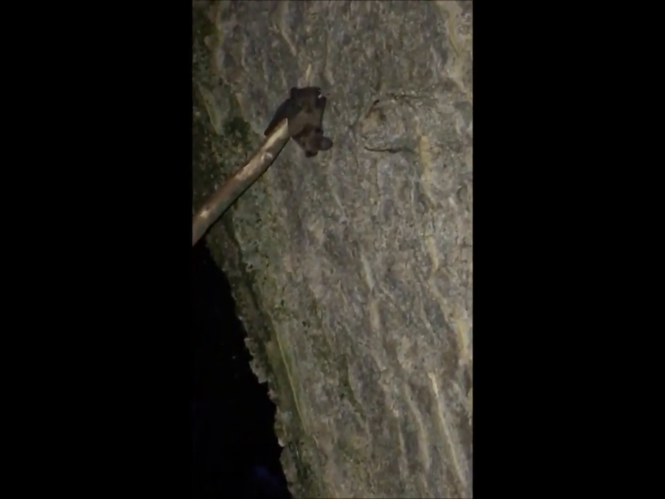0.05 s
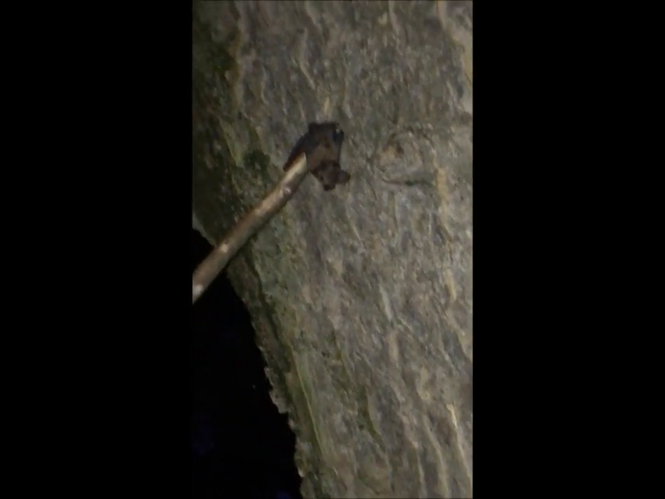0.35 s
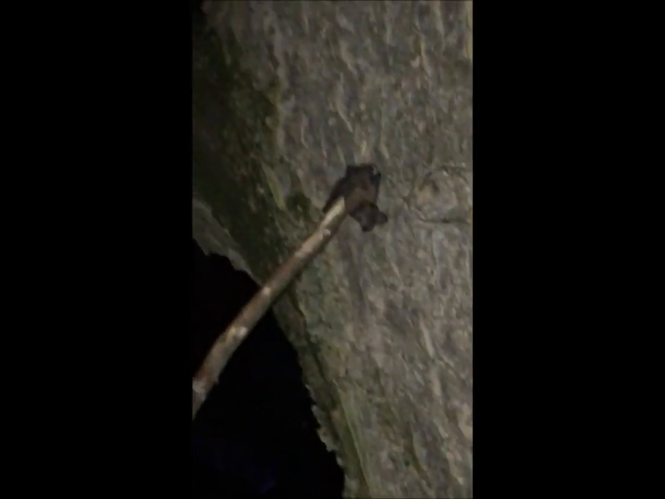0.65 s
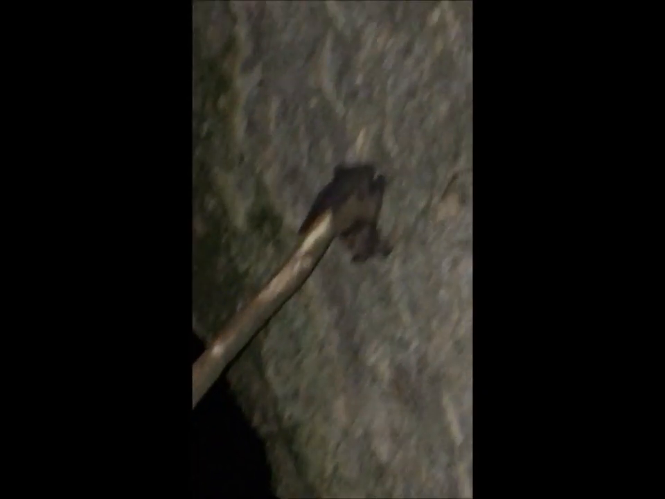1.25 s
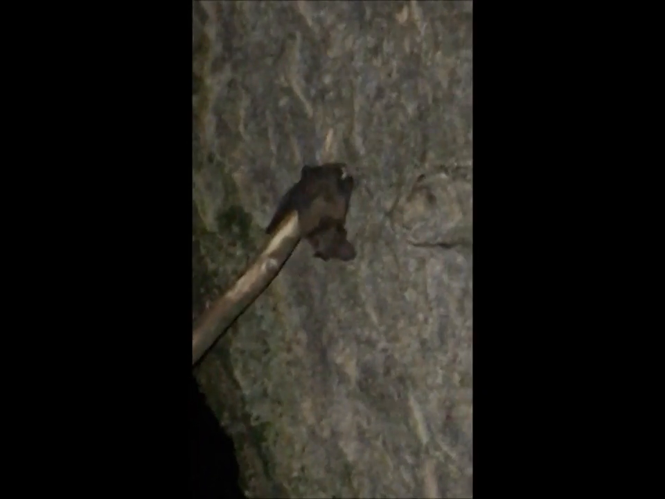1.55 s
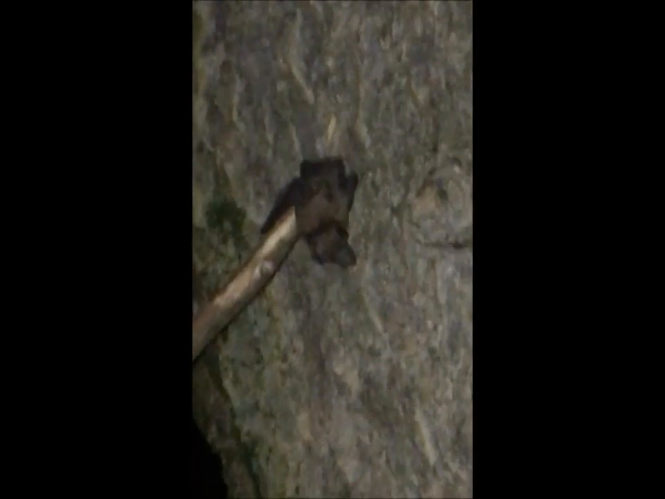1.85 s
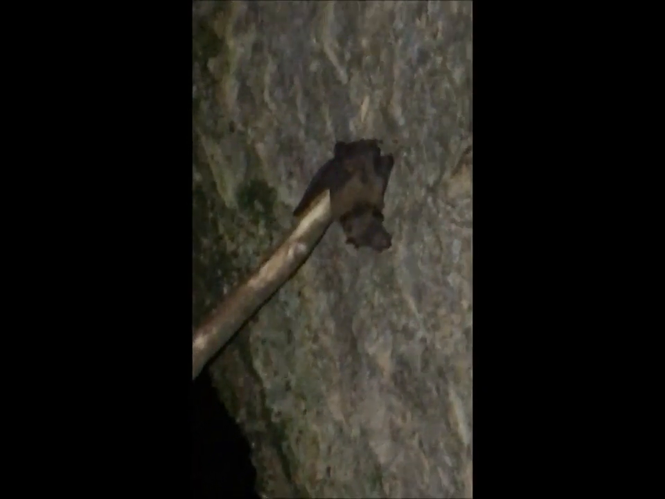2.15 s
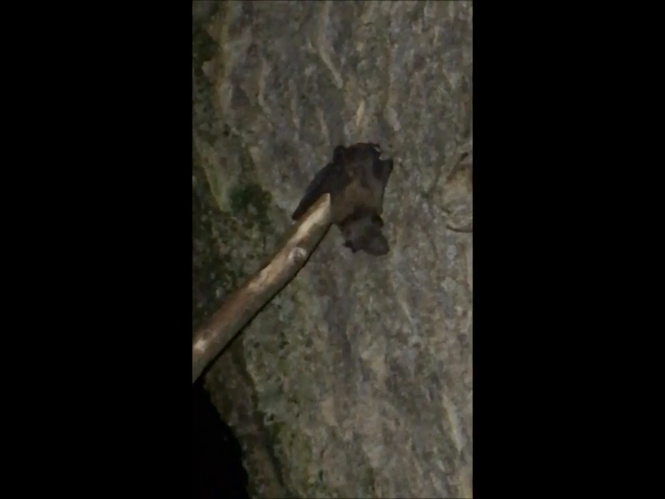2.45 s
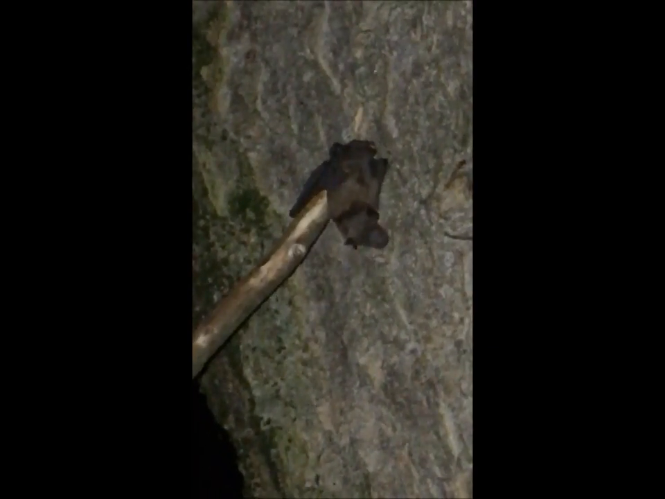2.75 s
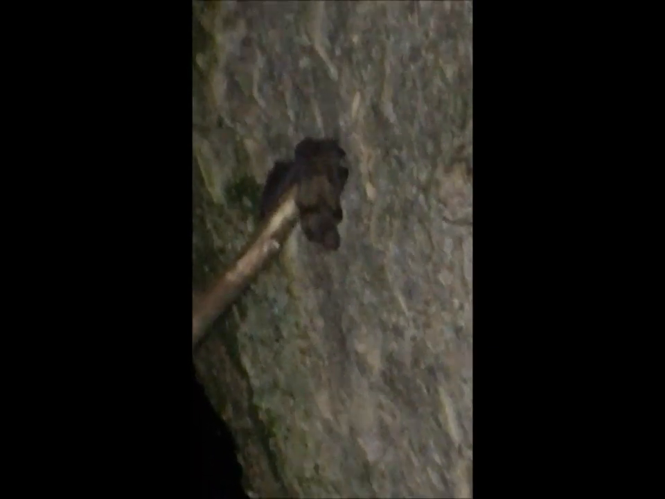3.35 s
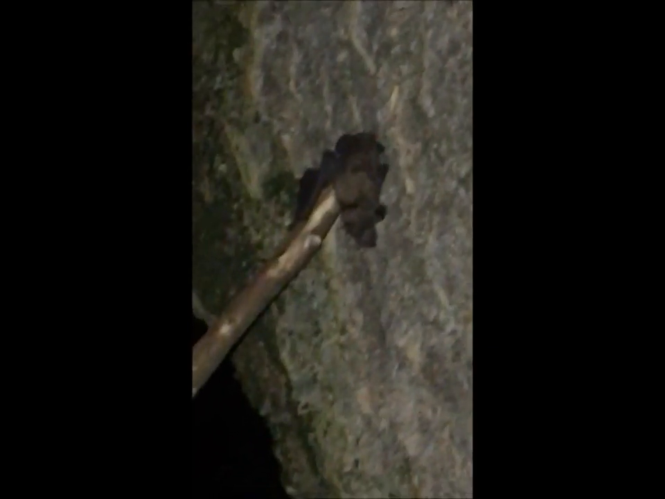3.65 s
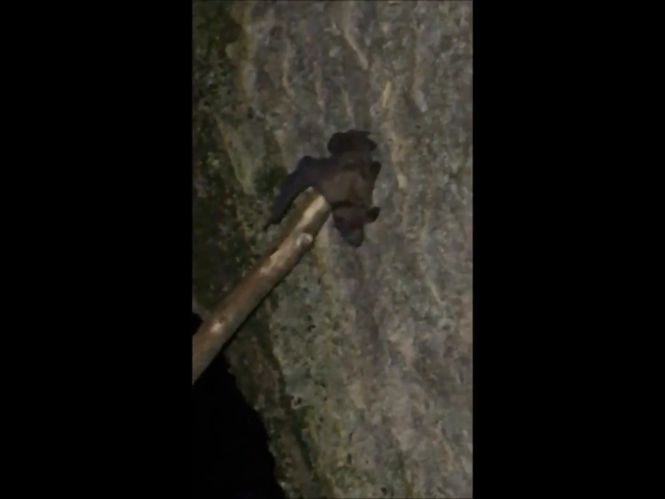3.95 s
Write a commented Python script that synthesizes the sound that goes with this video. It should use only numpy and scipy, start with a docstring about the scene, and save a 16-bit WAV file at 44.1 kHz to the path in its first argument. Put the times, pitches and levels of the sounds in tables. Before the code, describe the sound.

A small bat gives sharp, very high chirps and clicks over quiet hiss.

```python
"""A small bat scolding

A bat on a tree trunk, touched with a stick, scolds close to the microphone. Each call is a whistle of
a few milliseconds that plunges from near 16 kHz towards 8 kHz and leaves a faint echo. A few come with
a raspy squeak, and strong ones overload the microphone with a soft thump. Claws or the stick brush
the bark, and behind it all lie quiet hiss and a low rumble."""
import sys
import numpy as np
from scipy import signal
from scipy.fft import rfft, irfft, next_fast_len
from scipy.io import wavfile
from scipy.ndimage import map_coordinates

SR = 44100
rng = np.random.default_rng(int(sys.argv[2]) if len(sys.argv) > 2 else 0)


def int16_out(signal):
    """Quantize to a 16-bit WAV file."""
    q = np.round(np.clip(np.atleast_2d(signal).T, -1, 1) * 32767)
    wavfile.write(sys.argv[1], SR, q.astype(np.int16))


N = 176400  # 4 seconds


def amp(db):
    """Turn decibels (dB) into a number to multiply a sound by."""
    return 10 ** (np.asarray(db) / 20)


def unit(x):
    """Scale a sound so that its average power is 1."""
    return x / np.sqrt(np.mean(x ** 2) + 1e-20)


def filtered(x, response):
    """Turn each frequency of x up or down by the factor response(hz)."""
    size = next_fast_len(N + SR // 2)
    return irfft(rfft(x, size) * response(np.fft.rfftfreq(size, 1 / SR)), size)[:N]


def add(track, start_s, sound):
    """Mix a sound into the track, dropping whatever falls outside it."""
    i = round(start_s * SR)
    part = sound[max(-i, 0):N - i]
    track[max(i, 0):][:len(part)] += part


def wobble(t, rate):
    """A smooth random curve that passes through `rate` random values a second."""
    return map_coordinates(rng.standard_normal(512), [(t - t[0]) * rate], mode='wrap')


def noise_band(centre_hz, octaves):
    """Noise gathered around one pitch; more octaves make it broader."""
    noise = rng.standard_normal(N)
    return unit(filtered(noise, lambda hz: np.exp(-(np.log2((hz + 1) / centre_hz) / octaves) ** 2)))


def background():
    """Hiss whose treble dips briefly three times, and a low rumble that swells and sinks."""
    # Each row: frequency in Hz, relative level of the hiss in dB.
    hiss_tone = [(20, -30), (32, -17), (43, -9), (54, -3), (72, -4), (88, -6), (108, -15), (160, -12),
                 (250, -19), (310, -16.5), (430, -22.5), (600, -23), (800, -26.3), (1200, -26),
                 (1600, -26.7), (2100, -26), (2600, -28.3), (3050, -27.3), (3500, -28.6), (3900, -26.3),
                 (4400, -29.5), (4950, -32), (5600, -30.5), (9500, -35), (10400, -39), (11200, -36.3),
                 (14000, -38.7), (15500, -40), (16200, -50)]
    # Each row: time in seconds, change in the treble's level in dB.
    treble_dips = [(0, 0), (1.49, 0), (1.51, -7), (1.61, -7), (1.66, 0), (2.055, 0), (2.07, -7), (2.09, -7),
                   (2.11, 0), (2.72, 0), (2.75, -7), (2.91, -7), (2.97, 0), (4, 0)]
    # Each row: time in seconds, relative level of the rumble in dB before swell_share scales it.
    rumble_levels = [(0.0, 2.6), (0.39, -0.9), (0.53, 3.6), (1.0, -0.6), (1.07, -6.4), (1.13, 0.2),
                     (1.3, 1.3), (1.36, -1.9), (1.5, -2.2), (1.65, 3.4), (1.81, -7.0), (1.91, 3.6),
                     (2.0, -0.9), (2.09, 3.5), (2.33, 0.2), (2.44, -5.9), (2.7, 3.0), (2.93, -0.7),
                     (2.98, 1.9), (3.05, -3.4), (3.1, -1.4), (3.35, -1.9), (3.45, 2.9), (3.51, -1.8),
                     (3.66, 2.7), (3.99, -5.3)]
    hiss_db, treble_hz, dip_share = -56.3, 3600, .15  # this share of a dip reaches the whole hiss
    rumble_db, rumble_hz, width_hz = -60, 75, 8
    swell_share, bass_hz = .8, 140  # the bass of the hiss swells along with the rumble
    t = np.arange(N) / SR
    tone_hz, tone_db = np.transpose(hiss_tone)
    tone = lambda hz: amp(np.interp(np.log(hz + 1), np.log(tone_hz + 1), tone_db))
    hiss = amp(hiss_db) * unit(filtered(rng.standard_normal(N), tone))
    treble = filtered(hiss, lambda hz: dip_share + (1 - dip_share) * hz**2 / (hz**2 + treble_hz**2))
    bass = filtered(hiss, lambda hz: np.exp(-(hz / bass_hz) ** 2))
    dips = amp(np.interp(t, *np.transpose(treble_dips)))
    narrow_peak = lambda hz: 1 / (1 + ((hz - rumble_hz) / width_hz) ** 2)
    rumble = unit(filtered(rng.standard_normal(N), narrow_peak))
    swell = unit(amp(swell_share * np.interp(t, *np.transpose(rumble_levels))))
    return hiss + (dips - 1) * treble + (swell - 1) * bass + amp(rumble_db) * swell * rumble


def whistle(hz):
    """A pure tone that follows a pitch curve and fades out where it gets too high to hear."""
    audible = np.clip((17500 - hz) / 1000, 0, 1)
    return audible * np.sin(2 * np.pi * (np.cumsum(hz) / SR + rng.random()))


def coloured(x, bands):
    """Boost or weaken bands of pitch, a little differently for each call as the bat's head turns."""
    for (hz, width, db), (shift, depth) in zip(bands, rng.standard_normal((len(bands), 2))):
        centre = min(hz * (1 + .01 * shift), SR / 2 - 1)
        band = signal.lfilter(*signal.iirpeak(centre, centre / width, SR), x)
        x = x + (amp(db * (1 + .25 * depth)) - 1) * band
    return x


def reflections(fade_s, delay_s):
    """A cloud of tiny echoes that has built up by delay_s and drops 60 dB in fade_s."""
    t = np.arange(SR // 3) / SR
    onset = np.clip(2 * t / delay_s - 1, 0, 1)
    tail = rng.standard_normal(len(t)) * amp(-60 * t / fade_s) * onset
    return tail / np.linalg.norm(tail)


def with_echo(call):
    """A call arrives directly, bounces off the bark and echoes from the surroundings."""
    # Each row of both tables: centre of a band in Hz, its width in Hz, typical boost or cut in dB.
    direct_bands = [(8450, 900, 5.5), (8950, 200, -7), (10900, 500, -14), (12400, 400, -6),
                    (13750, 600, 2.5), (14750, 450, -6)]
    echo_bands = [(13400, 2000, -5.5), (15400, 700, 2)]
    bark = amp(-19) * reflections(fade_s=.016, delay_s=.001)
    bark[0] += 1  # the direct sound
    surroundings = amp(-24.5) * reflections(fade_s=.2, delay_s=.007)
    near = signal.fftconvolve(coloured(call, direct_bands), bark)
    far = signal.fftconvolve(coloured(call, echo_bands), surroundings)
    return near + far


def scolding_calls():
    """The bat's plunging whistles open with a click and grow rough as they fade."""
    # Each row: time of the peak in seconds, level in dB, pitch at the peak in Hz, pitch it heads for
    # in Hz, then four times in seconds: to glide about two thirds of the way there, to rise 60 dB,
    # to fall 60 dB, and from the peak to the end.
    calls = [(0.0149, -18.4, 13590.0, 7140.0, 0.0012, 0.0025, 0.0045, 0.006),
             (0.0494, -11.4, 14360.0, 6600.0, 0.0058, 0.002, 0.013, 0.0112),
             (0.5109, -12.6, 14400.0, 6350.0, 0.0052, 0.0016, 0.0127, 0.012),
             (0.5572, -16.4, 14030.0, 5810.0, 0.007, 0.009, 0.0123, 0.0083),
             (0.7815, -24.5, 12910.0, 8190.0, 0.0016, 0.0006, 0.0061, 0.0033),
             (0.8855, -20.2, 14580.0, 7760.0, 0.0049, 0.008, 0.0183, 0.0021),
             (1.0904, -12.8, 14100.0, 6030.0, 0.0046, 0.0014, 0.0088, 0.0055),
             (1.6515, -12.1, 13700.0, 6320.0, 0.0072, 0.007, 0.012, 0.0074),
             (2.1054, -7.5, 13640.0, 6350.0, 0.0057, 0.0053, 0.0104, 0.0075),
             (2.3282, -13.0, 13290.0, 7510.0, 0.0037, 0.001, 0.01, 0.0061),
             (2.9365, -22.5, 13160.0, 8880.0, 0.0008, 0.0021, 0.0083, 0.0071),
             (2.968, -12.9, 14140.0, 6490.0, 0.005, 0.0013, 0.0124, 0.0111),
             (3.1999, -12.1, 14060.0, 8190.0, 0.0045, 0.0011, 0.0117, 0.0043),
             (3.3386, -28.6, 13130.0, 10980.0, 0.0008, 0.001, 0.0132, 0.0011),
             (3.3651, -23.9, 13570.0, 7950.0, 0.0014, 0.0016, 0.0077, 0.009),
             (3.3971, -18.4, 14180.0, 7650.0, 0.0036, 0.0011, 0.0128, 0.0101),
             (3.662, -12.8, 14360.0, 6190.0, 0.0076, 0.0085, 0.0145, 0.0091),
             (3.8694, -20.3, 12170.0, 7330.0, 0.0026, 0.0006, 0.0091, 0.005),
             (3.913, -15.8, 12260.0, 8270.0, 0.0031, 0.004, 0.01, 0.0076)]
    lowest_hz, highest_hz, jitter = 8050, 15650, .012  # the glide's limits, and how much it trembles
    tail_db, release_s = -36, .001  # a long call levels out this far below its peak, then stops
    roughness, roughen_s = .3, .01
    click_db, click_fade_s, click_lead_s = -46.5, .02, .0015
    out = np.zeros(N)
    t = np.arange(-SR // 200, SR // 50) / SR  # zero is the call's peak
    for peak_s, db, peak_hz, end_hz, glide, rise, fall, length in calls:
        plunge = end_hz + (peak_hz - end_hz) * np.exp(-t / glide)
        hz = np.clip(plunge, lowest_hz, highest_hz) * (1 + jitter * wobble(t, 2500))
        shape_db = np.minimum(60 * t / rise, np.maximum(-60 * t / fall, tail_db))
        loudness = amp(db + shape_db) * np.clip((length - t) / release_s, 0, 1)
        flutter = 1 + roughness * np.clip(t / roughen_s, 0, 1) * wobble(t, 1500)
        click_age = t + click_lead_s
        click_level = (click_age > 0) * amp(db + click_db - 60 * abs(click_age) / click_fade_s)
        click = click_level * rng.standard_normal(len(t))
        voice = whistle(hz) + amp(-6) * whistle(2 * hz)
        add(out, peak_s + t[0], with_echo(click + loudness * flutter * voice))
    return out


def squeaks():
    """Some calls break into a short, raspy squeak near 3 kHz whose pitch rises and falls."""
    # Each row: start in seconds, pitch in Hz, level in dB, length in seconds.
    events = [(.0147, 3250, -43, .008), (2.9372, 2980, -48.5, .0042), (3.367, 2680, -57, .005)]
    # Levels in dB of the tones at one to five times the pitch.
    harmonics_db = [0, -14, 0, -1, 2]
    bend, jitter = .14, .06  # as shares of the pitch
    rasp_db, rasp_fade_s = -4, .04
    out = np.zeros(N)
    t = np.arange(SR // 30) / SR
    for start_s, hz, db, length in events:
        arch = np.sin(np.pi * np.clip(t / length, 0, 1))
        pitch = hz * (1 + bend * (arch - np.sqrt(.5))) * (1 + jitter * wobble(t, 2500))
        voice = sum(amp(level) * whistle(k * pitch) for k, level in enumerate(harmonics_db, 1))
        rasp = amp(rasp_db - 60 * t / rasp_fade_s) * noise_band(hz, octaves=.42)[:len(t)]
        add(out, start_s, with_echo(amp(db) * (np.sqrt(abs(arch)) * voice + rasp)))
    return out


def microphone_thumps():
    """An overloaded microphone turns a call into one push, rings, then swings back to rest."""
    # Each row: time in seconds, push level in dB before the bass cut, width in seconds, swing in dB.
    thumps = [(.0155, -48, .0007, -60), (.0506, -29.5, .00052, -45), (.5123, -33, .00054, -45),
              (.558, -46, .0005, -60), (1.0912, -41, .0006, -57), (1.6510, -37, .00065, -43.5),
              (2.1066, -39, .0009, -47), (2.9375, -45, .0005, -60), (2.9695, -32.5, .00039, -44),
              (3.6615, -41, .0007, -46)]
    snap_db, snap_s, bass_cut_hz = -10, .00024, 110  # the snap is the push's sharp front edge
    swing_hz, swing_fade_s, swing_delay_s = 88, .05, .002
    t = np.arange(N) / SR
    push = lambda s, width: np.exp(-((t - s) / width) ** 2)
    pushes = sum(-amp(db) * (push(s, width) + amp(snap_db) * push(s - width, snap_s))
                 for s, db, width, _ in thumps)
    bass_cut = signal.butter(4, bass_cut_hz, 'high', fs=SR, output='sos')
    out = signal.sosfilt(bass_cut, pushes)  # this filter makes each push ring
    age = t[:SR // 10]
    for s, _, _, swing_db in thumps:
        swing = -amp(swing_db - 60 * age / swing_fade_s) * np.sin(2 * np.pi * swing_hz * age)
        add(out, s + swing_delay_s, swing)
    return out


def soft_calls():
    """Between loud calls the bat gives quiet blips made of two falling tones."""
    # Each row: time in seconds, upper pitch in Hz, upper tone's level in dB, lower tone's level in dB.
    calls = [(.2997, 14500, -41, -41), (1.0420, 14700, -37, -47), (1.3197, 14300, -31.5, -47),
             (1.8832, 14000, -30.5, -50), (2.5195, 13900, -41, -62), (2.7027, 14700, -43, -35)]
    width_s, lower_lead_s = .00095, .0005
    lower_ratio, jitter = .63, .07  # the lower tone's pitch over the upper's, and how much it trembles
    upper_fall_per_s, lower_fall_per_s = 55, 80
    out = np.zeros(N)
    t = np.arange(-SR // 200, SR // 50) / SR
    swell = lambda time: np.exp(-(time / width_s) ** 2)
    for peak_s, upper_hz, upper_db, lower_db in calls:
        upper = swell(t) * whistle(upper_hz * np.exp(-upper_fall_per_s * t))
        lower_hz = lower_ratio * upper_hz * np.exp(-lower_fall_per_s * t)
        lower = swell(t + lower_lead_s) * whistle(lower_hz * (1 + jitter * wobble(t, 4000)))
        add(out, peak_s + t[0], with_echo(amp(upper_db) * upper + amp(lower_db) * lower))
    return out


def scratches():
    """Claws or the stick brush the bark, making faint puffs of noise."""
    # Each row: time in seconds, centre pitch in Hz, level in dB, width in seconds.
    brushes = [(.512, 1950, -59.5, .004), (.982, 1200, -62, .008), (1.733, 950, -60.5, .006),
               (2.712, 7000, -62.5, .014), (2.995, 6500, -58.5, .01)]
    out = np.zeros(N)
    t = np.arange(N) / SR
    for peak_s, hz, db, width in brushes:
        out += amp(db) * np.exp(-((t - peak_s) / width) ** 2) * noise_band(hz, octaves=.6)
    return out


def scene():
    """The bat over the quiet background, in one channel."""
    bat = scolding_calls() + soft_calls() + squeaks()
    return (bat + microphone_thumps() + scratches() + background())[None]


def record(dry):
    """The recorder steeply cuts away the very highest treble."""
    rolloff_hz, top_hz = 15700, 16600
    return filtered(dry[0], lambda hz: (hz < top_hz) / np.sqrt(1 + (hz / rolloff_hz) ** 120))[None]


dry = scene()
out = record(dry)
int16_out(out)
```